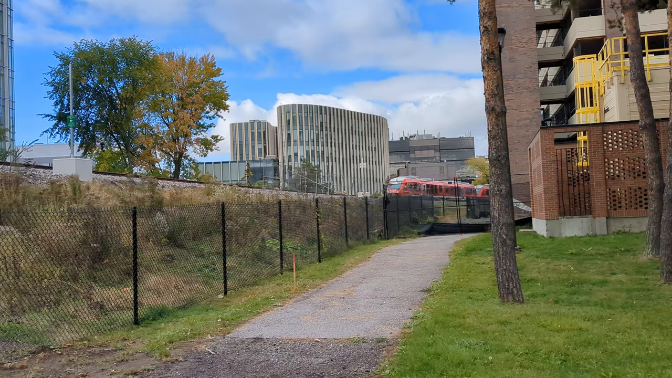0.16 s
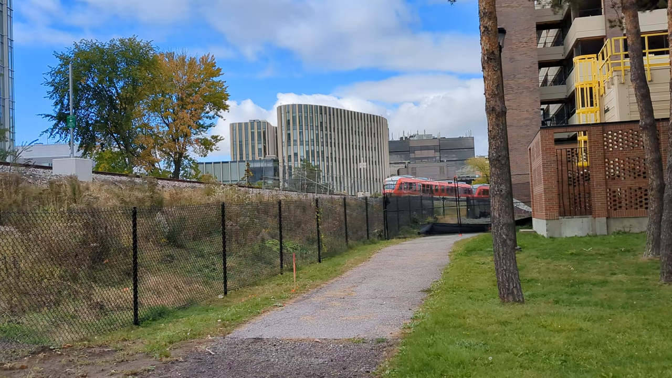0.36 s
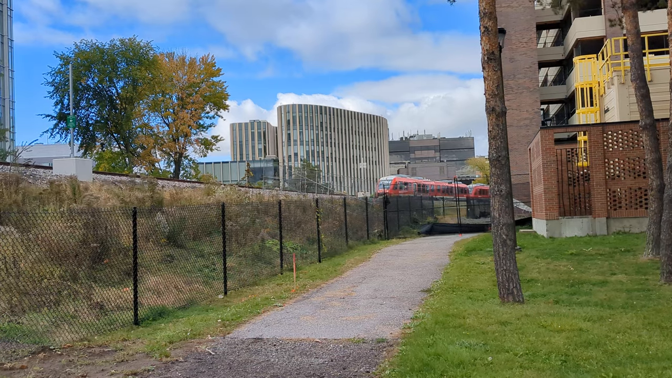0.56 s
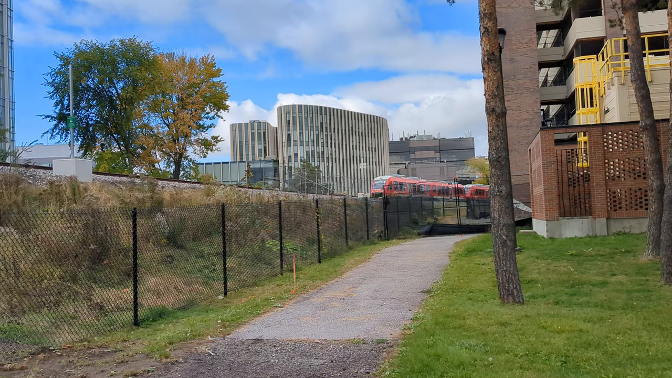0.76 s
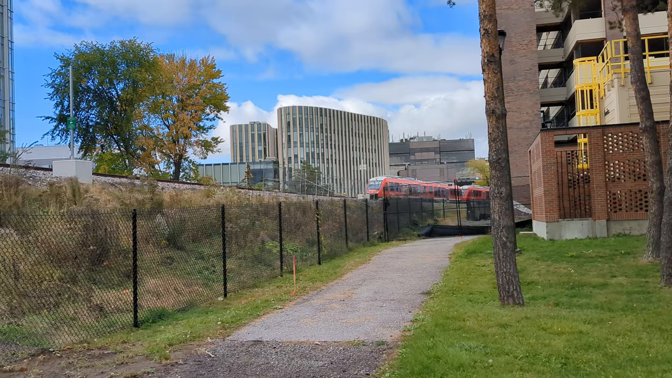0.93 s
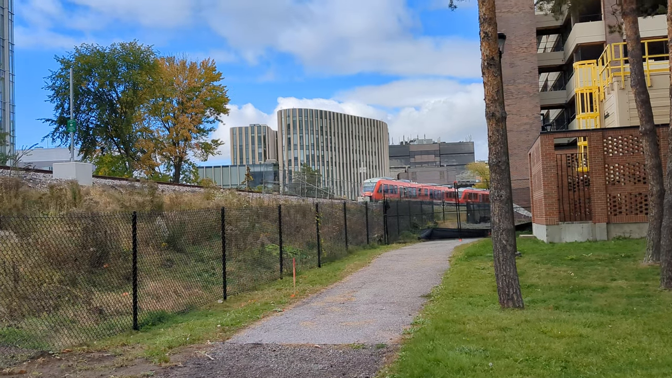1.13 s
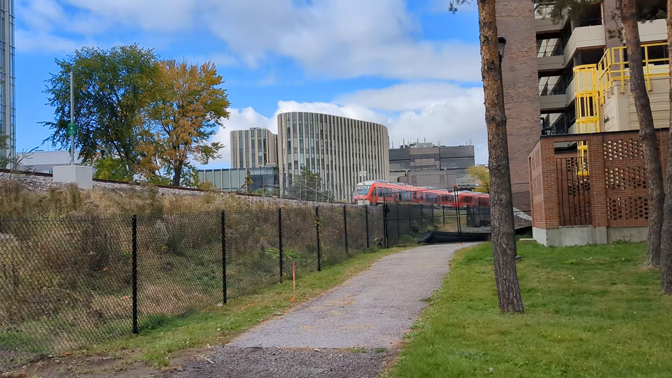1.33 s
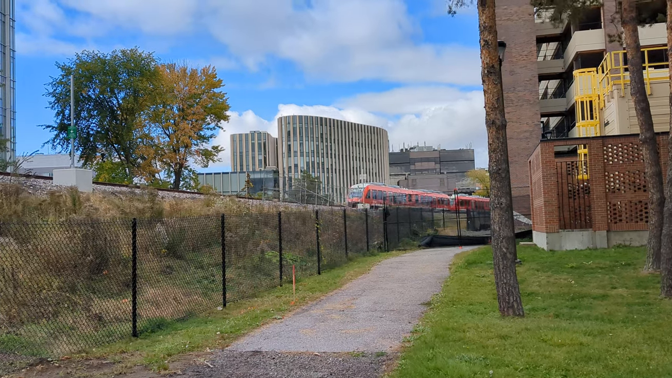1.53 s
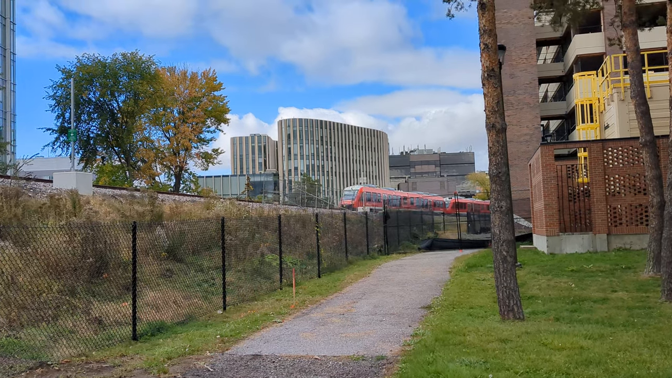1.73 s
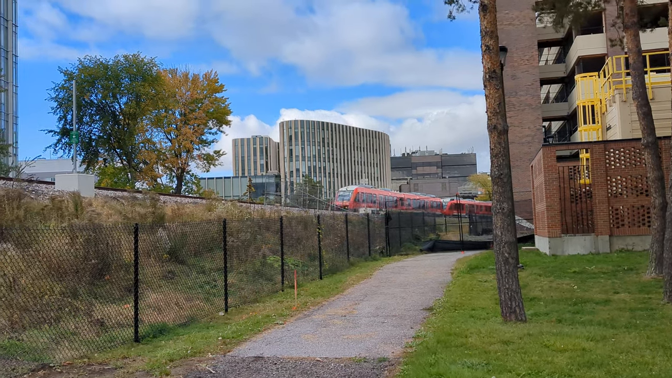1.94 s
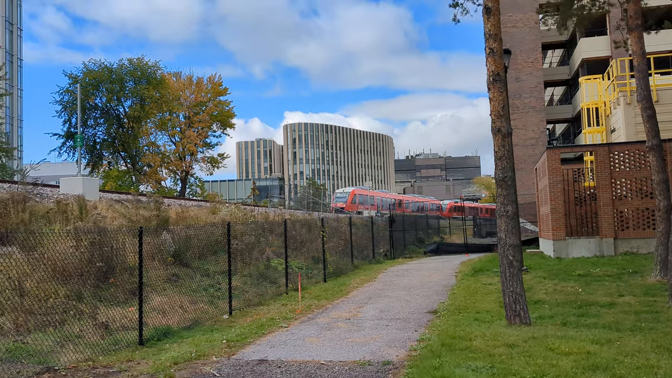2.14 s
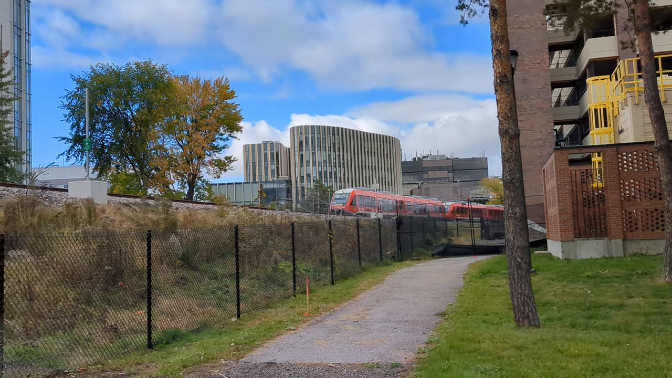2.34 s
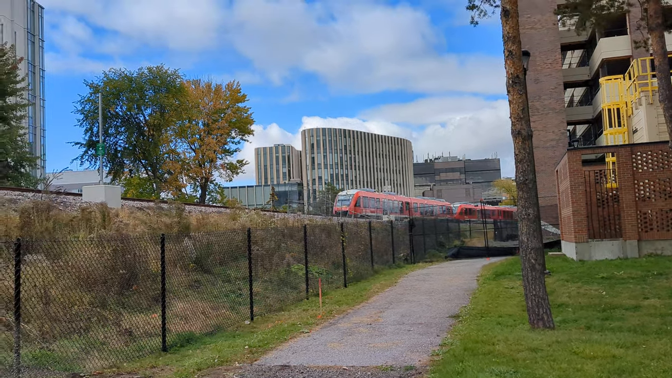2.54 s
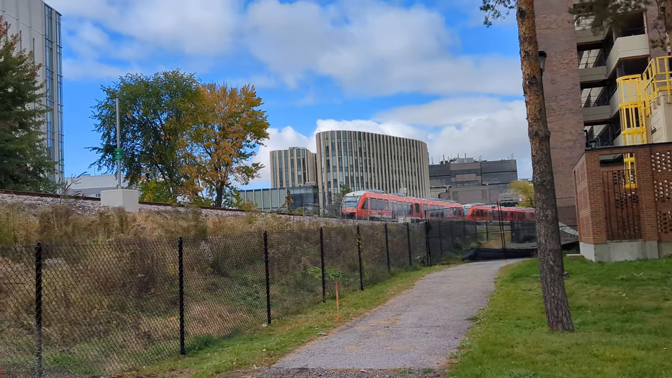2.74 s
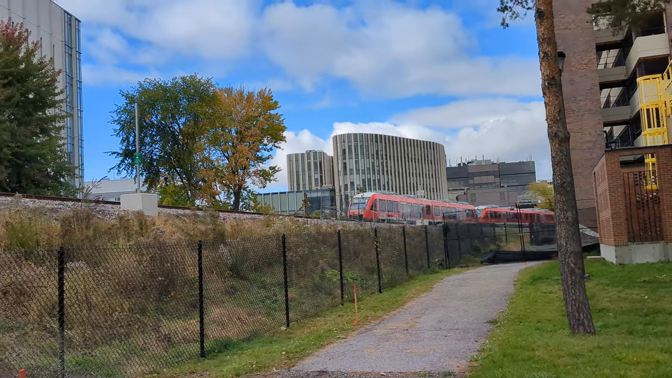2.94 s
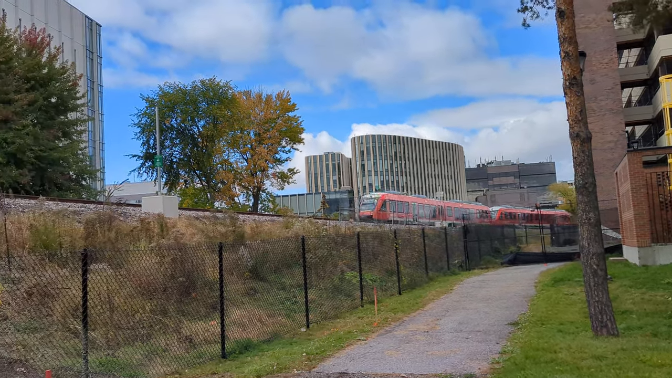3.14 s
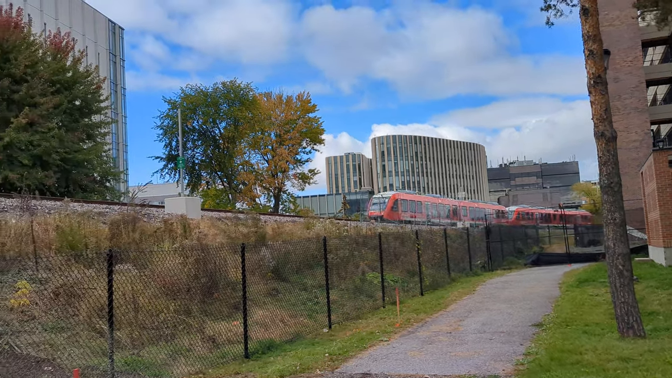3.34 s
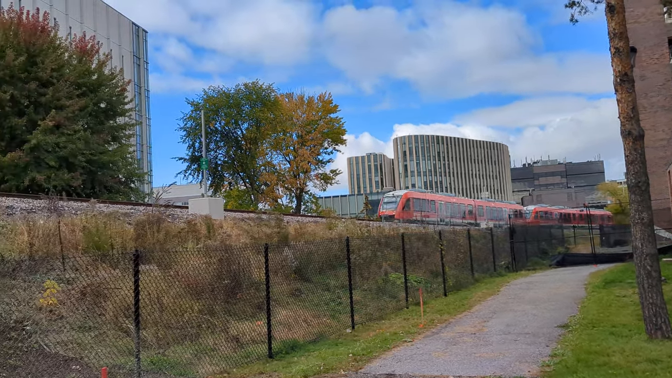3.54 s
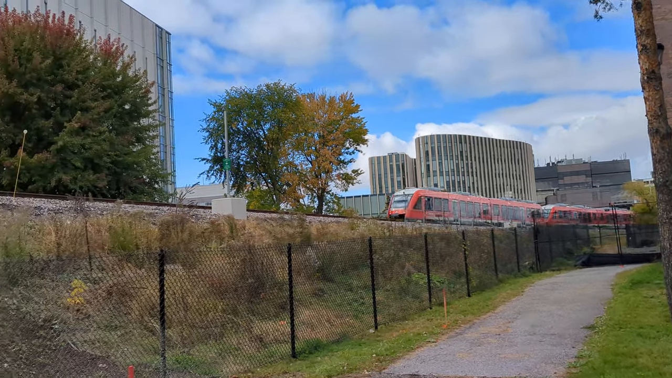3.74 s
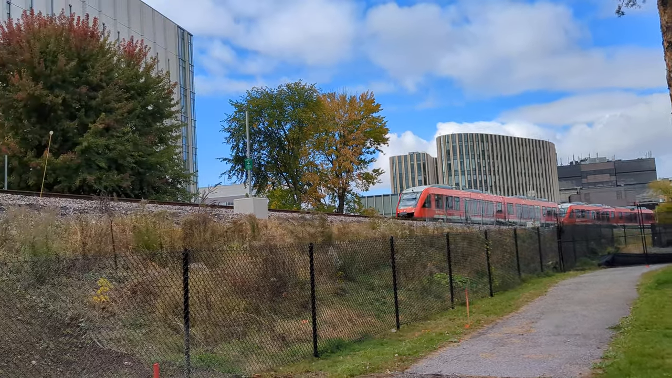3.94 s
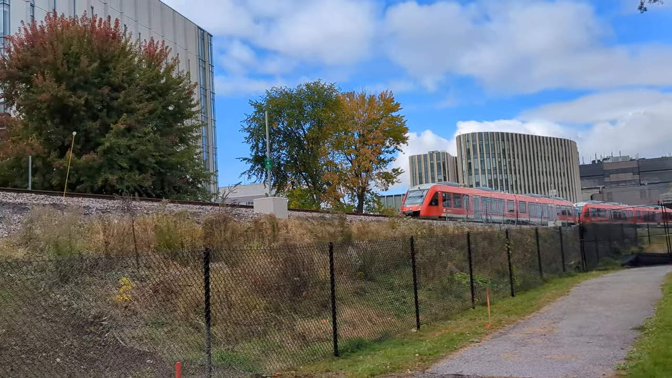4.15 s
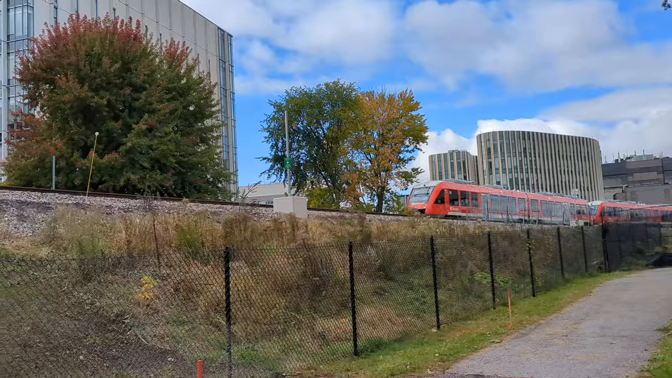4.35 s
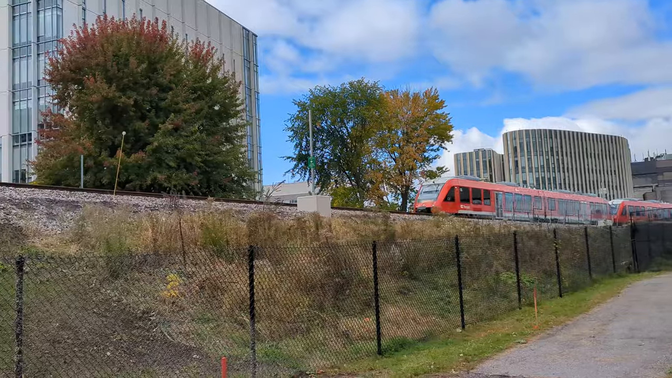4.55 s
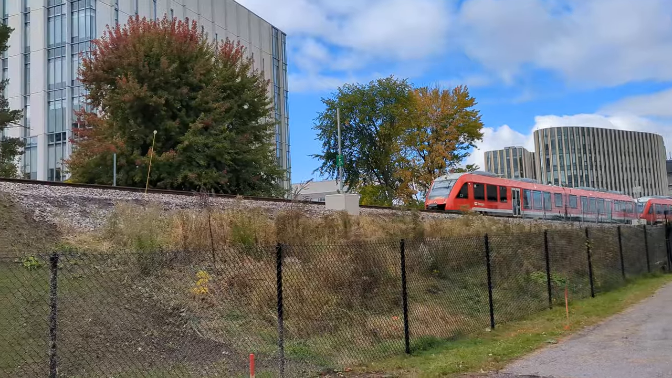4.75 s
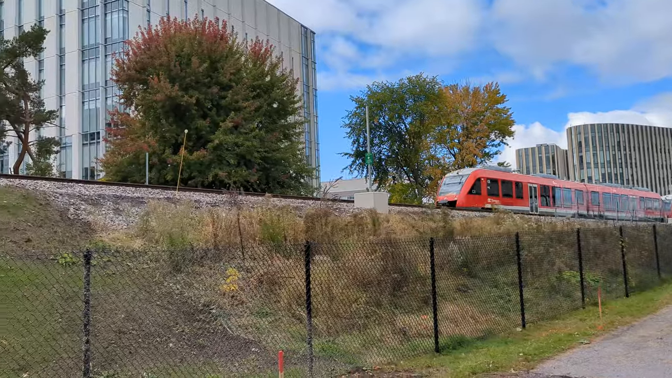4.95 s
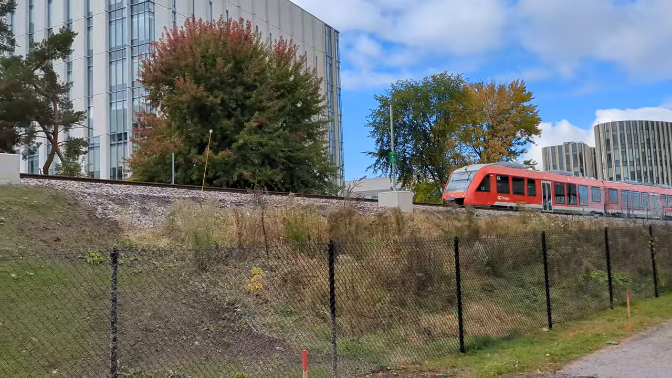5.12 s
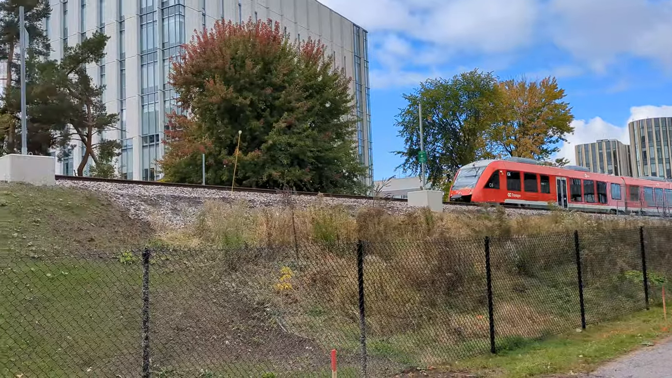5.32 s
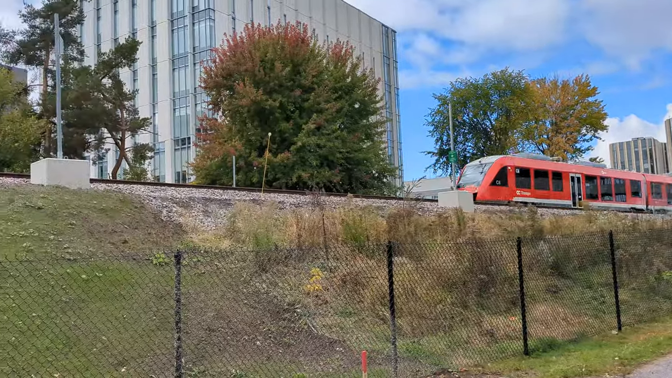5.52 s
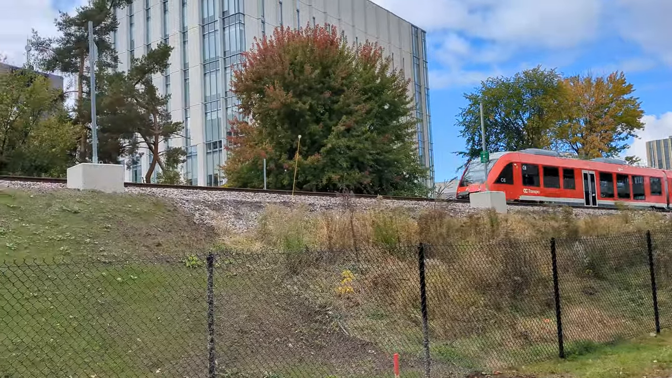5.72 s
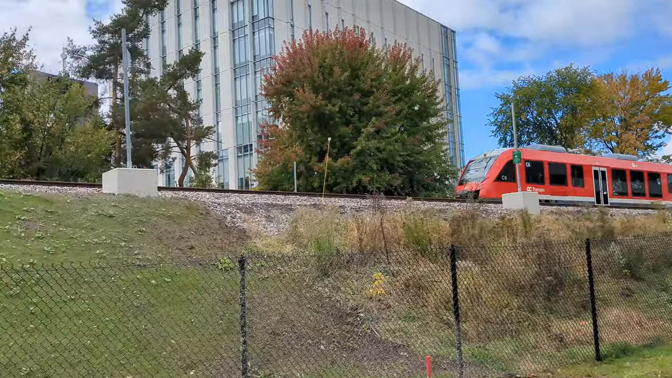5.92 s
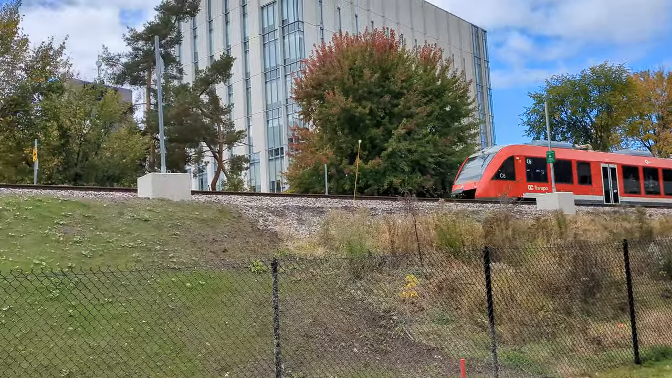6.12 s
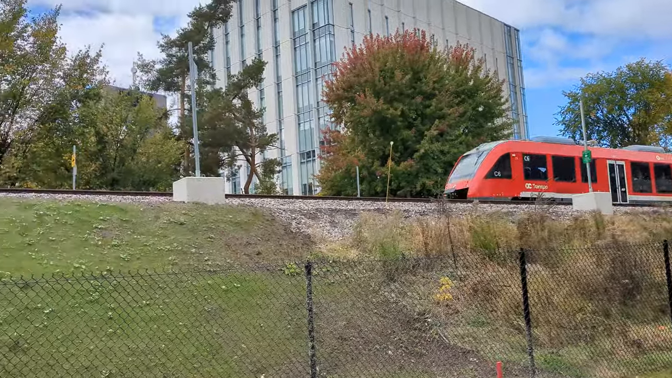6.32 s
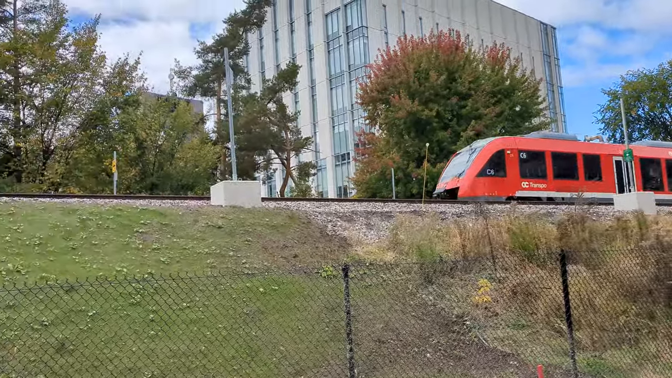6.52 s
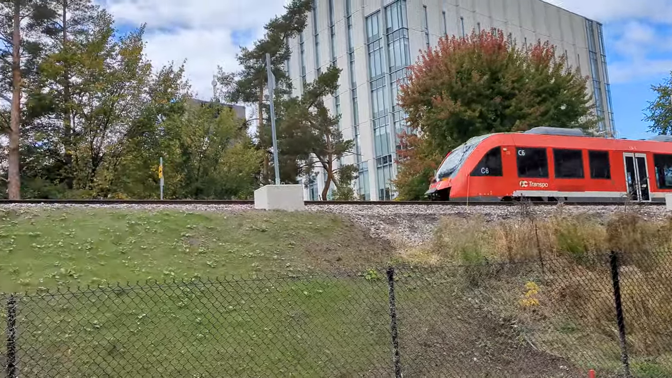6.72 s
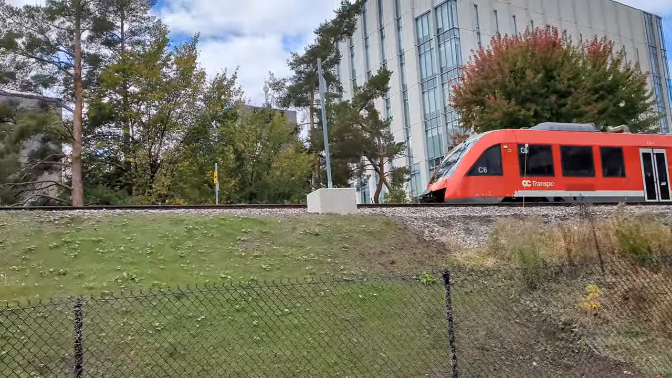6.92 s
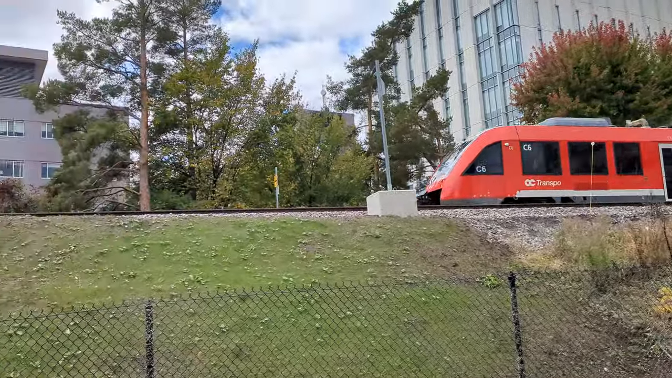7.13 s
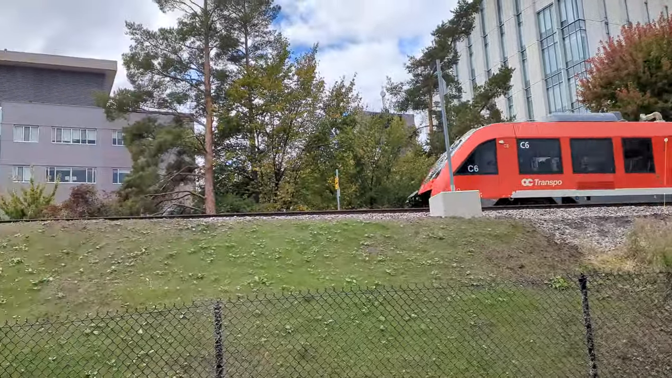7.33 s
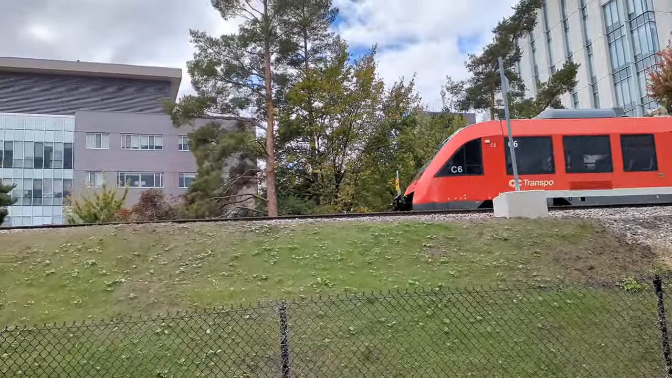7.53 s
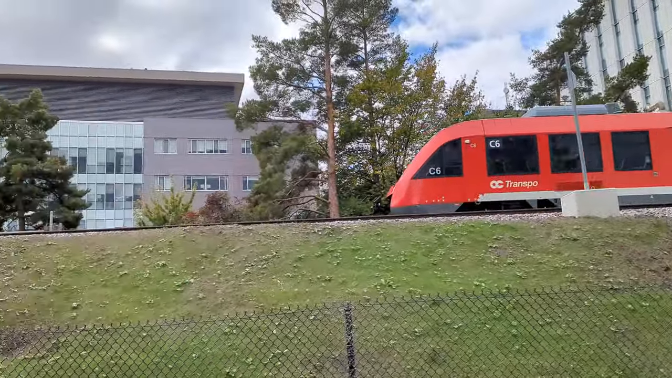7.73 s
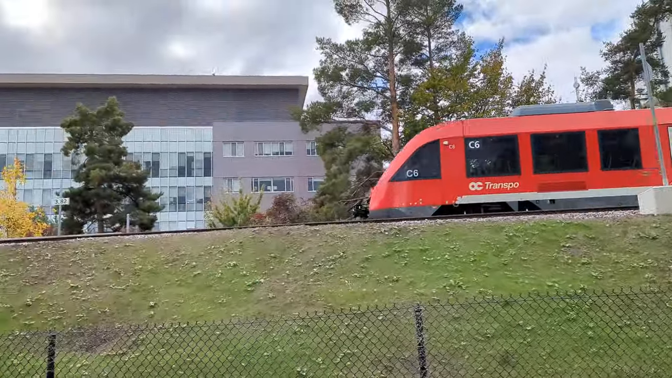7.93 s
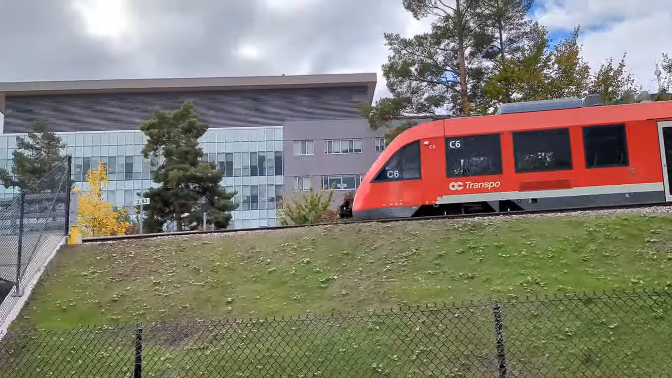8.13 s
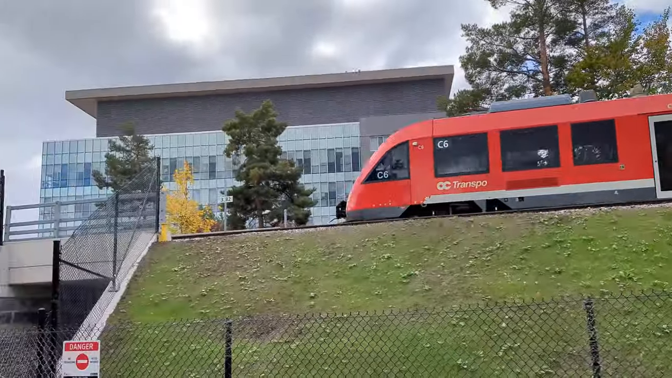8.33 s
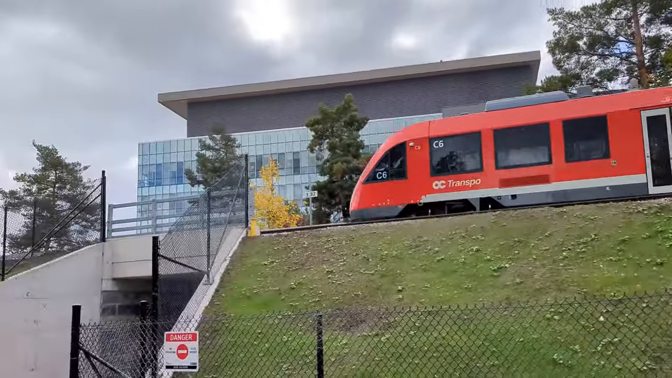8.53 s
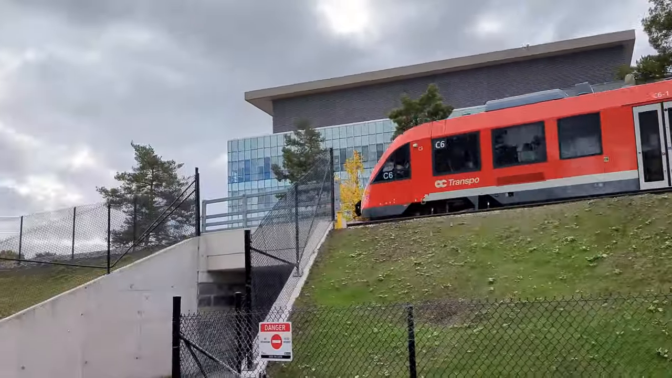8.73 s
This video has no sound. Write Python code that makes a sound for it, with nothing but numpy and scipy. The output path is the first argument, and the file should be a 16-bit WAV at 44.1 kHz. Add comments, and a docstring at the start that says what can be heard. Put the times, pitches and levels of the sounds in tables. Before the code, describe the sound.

Outdoor train pass: thin metallic wheel squeals and hissing scrapes build over a low diesel rumble, ending close by with a swelling exhaust and heavy wind thumps.

```python
"""Two coupled diesel railcars come round a curve on an embankment and draw level with the listener.
From the start wheel flanges grind in bouts and ring the wheels, over rolling roar and exhaust drone.
Gusts soon buffet the microphone; squeals, made of single wheel modes, come thicker and louder.
The leading engine revs up, changes gear and pulls again; buildings answer the squeals throughout.
Near the end the exhaust swells, and the train is closest while the flanges still scrape."""
import sys
import numpy as np
from scipy import signal
from scipy.fft import rfft, irfft, next_fast_len
from scipy.io import wavfile
from scipy.ndimage import uniform_filter1d, map_coordinates

SR = 44100
rng = np.random.default_rng(int(sys.argv[2]) if len(sys.argv) > 2 else 0)


def unload_wav(signal):
    """Save mono or channel-first audio to the path in sys.argv[1] as 16-bit WAV at rate SR, clipped to [-1, 1]."""
    wavfile.write(
        sys.argv[1],
        SR,
        np.round(np.clip(np.atleast_2d(signal).T, -1, 1) * 32767).astype(np.int16),
    )


N = 386757
CLOSEST_M = 15  # least distance to the train


def amp(db):
    """Decibels to gain."""
    return 10 ** (np.asarray(db) / 20)


def unit(x):
    """Scale to an rms (average strength) of 1."""
    return x / np.sqrt(np.mean(x ** 2) + 1e-20)


def along(points, hz):
    """Read (frequency [Hz], value) points on a log frequency axis."""
    f, v = np.transpose(points)
    return np.interp(np.log(hz + 1), np.log(f + 1), v)


def curves(rows):
    """One value per sample for each column after the time."""
    s, *cols = np.transpose(rows)
    return [np.interp(np.arange(N) / SR, s, c) for c in cols]


def during(rows):
    """A soft gate over the time that a curve covers."""
    start, end = rows[0][0], rows[-1][0]
    return np.interp(np.arange(N) / SR, [start - .06, start, end, end + .06], [0, 1, 1, 0])


def held(rows, attack_s, release_db_per_s):
    """Events that rise, hold and die away: one gain curve for each level column."""
    t = np.arange(0, N / SR, .002)
    start, end, *levels_db = np.transpose(rows)[:, :, None]
    rise = np.clip((t - start) / attack_s, 0, 1)
    gate = rise * amp(-release_db_per_s * np.maximum(t - end, 0))
    # events that overlap add up by power
    gains = [np.linalg.norm(gate * amp(db), axis=0) for db in levels_db]
    return curves(np.column_stack([t] + gains))


def wobble(rate, size=N):
    """A smooth random curve, rate knots a second."""
    knots = rng.standard_normal(int(size * rate / SR) + 4)
    return map_coordinates(knots, [np.arange(size) * rate / SR])


def filtered(x, response):
    """Shape x by a response of frequency."""
    m = next_fast_len(N + 8192)
    return irfft(rfft(x, m) * response(np.fft.rfftfreq(m, 1 / SR)), m)[..., :N]


def noise(response, alike):
    """Stereo noise of rms 1 with a given left-right likeness."""
    share = np.clip(alike, 0, 1)
    white = rng.standard_normal((3, N))
    stereo = np.sqrt(share) * white[2] + np.sqrt(1 - share) * white[:2]
    return unit(filtered(stereo, response))


def rush(spectrum, alike):
    """Noise with a broad colour, cut off an octave below its lowest point."""
    return noise(lambda hz: amp(along(spectrum, hz)) * (hz > spectrum[0][0] / 2), alike)


def ringing(modes, alike):
    """Resonances kept ringing by noise, as by friction."""
    def response(f):
        power = sum(amp(db) ** 2 / (1 + ((f - centre) / width * 2) ** 2) ** 1.87
                    for centre, width, db in modes)
        return np.sqrt(power)
    return noise(response, alike)


def patchy(x, depth_db):
    """The contact patch wanders, so that neighbouring bands swell and sink in turn."""
    z = signal.stft(x, nperseg=1024)[2]
    field = uniform_filter1d(rng.standard_normal(z.shape[1:]), size=7, axis=0)
    field = uniform_filter1d(field, size=16, axis=1)
    return unit(signal.istft(z * amp(depth_db * unit(field)), nperseg=1024)[1][:, :N])


def crowded(x):
    """Rail and bogie have countless weak modes, which ripple the colour finely."""
    def ripple(hz):
        return map_coordinates(rng.standard_normal(SR // 20), [hz / 20])
    return filtered(x, lambda hz: amp(1.4 * ripple(hz)))


def phase(hz):
    """Running phase of a moving pitch."""
    return 2 * np.pi * np.cumsum(hz) / SR


def pan(left_db):
    """Gains of the two channels, from how far left stands over right."""
    return amp([[left_db / 2], [-left_db / 2]])


def distance():
    """Metres to the train as it runs by at a steady speed."""
    speed_m_per_s, closest_s = 12, 8.3
    return np.hypot(CLOSEST_M, speed_m_per_s * (np.arange(N) / SR - closest_s))


def flanges():
    """Steel scrapes steel in stick and slip; the chatter drives the hiss and the wheel modes alike."""
    # bouts of flange contact: (start [s], end [s], hiss [dB], wheel ring [dB], grinding [dB])
    bout_rows = [(-0.02, 0.24, -56.5, -48, -53.5), (0.25, 0.32, -56, -43.5, -58),
                 (0.665, 1.08, -56, -47.5, -54.5), (1.08, 1.26, -57, -47, -58),
                 (1.37, 1.45, -52.5, -52, -54), (1.6, 1.68, -52.5, -41.5, -57),
                 (1.975, 2.13, -48, -40.5, -50.5), (2.14, 2.335, -45.8, -38.5, -53),
                 (2.482, 2.66, -46.5, -47, -53), (2.66, 2.94, -45.5, -42.5, -54),
                 (2.97, 3.19, -47.5, -45, -55), (3.18, 3.35, -48.5, -51, -53), (3.37, 3.6, -46, -47, -50),
                 (3.64, 3.9, -51.5, -56, -50), (3.96, 4.17, -49, -58, -54), (4.19, 4.28, -45, -39.5, -49),
                 (4.34, 4.42, -50, -58, -47), (4.47, 4.66, -42, -46, -42.5), (4.56, 4.66, -43, -35.5, -48),
                 (4.71, 4.8, -40.5, -40, -42.5), (4.82, 4.9, -46, -50, -58), (4.89, 5.06, -40.8, -41, -49),
                 (5.1, 5.38, -40.8, -56, -60), (5.39, 5.53, -39.5, -41, -47), (5.58, 5.88, -44.5, -49, -49),
                 (5.92, 6.4, -45, -54, -52), (6.06, 6.13, -52, -47, -54), (6.31, 6.37, -46, -48, -51),
                 (6.47, 6.68, -40, -54, -54), (6.85, 7.21, -40, -42, -48), (6.91, 7.08, -50, -34.5, -54),
                 (7.1, 7.25, -48, -41, -56), (7.425, 7.74, -36.8, -45, -45), (7.55, 7.8, -46, -44, -44.5),
                 (7.86, 7.98, -39, -41.5, -40.5), (7.99, 8.11, -32.4, -34.5, -37),
                 (8.12, 8.25, -34, -38.5, -43), (8.3, 8.44, -38, -39.5, -44),
                 (8.46, 8.57, -35.3, -42, -42.5)]
    # light rubbing between bouts, rows for hiss, wheel ring, grinding:
    # (level at the closest point [dB], loss with extra distance [dB per m])
    rubbing = [(-46.5, 0.34), (-51.5, 0.1), (-48, 0.16)]
    # resonances of rail and wheel: (frequency [Hz], width [Hz], level [dB])
    low_modes = [(1358, 79, -24), (2397, 140, -19), (2985, 70, -11.7), (3470, 140, -5.5), (3553, 46, 0),
                 (3790, 220, -19)]
    # higher resonances of the same: (frequency [Hz], width [Hz], level [dB])
    high_modes = [(4500, 180, -3.5), (4690, 100, -3), (5481, 80, -4), (5890, 50, -5.5), (6520, 120, -11),
                  (7060, 45, 1), (7170, 55, -1), (8880, 24, 1), (8975, 18, 1), (9680, 90, -7),
                  (10140, 26, 3), (10240, 24, 2), (11420, 40, -11), (11680, 55, -11)]
    # highest wheel modes, which carry only over a short way: (frequency [Hz], width [Hz], level [dB])
    top_modes = [(9350, 50, -2), (9700, 90, -3), (10120, 60, 0), (10500, 50, -5), (11330, 50, -5),
                 (11600, 45, -1.5), (12500, 80, -5), (13450, 50, -6)]
    # colour of the grinding: (frequency [Hz], relative level [dB])
    grind_colour = [(800, -40), (1050, -16), (1350, -7), (1700, -9), (1950, -2.5), (2450, 2.3),
                    (2750, -0.5), (3020, 1), (3250, -6), (3650, -1.5), (4200, -1.5), (5200, -5),
                    (7000, -39)]
    # colour of the hiss: (frequency [Hz], relative level [dB])
    hiss_colour = [(2500, -11), (4000, -1), (5200, -3.5), (7000, 2), (8000, -2), (8800, 0), (10000, -5.5),
                   (11000, -10.5), (12500, -26), (15000, -50)]
    # colour of the sizzle: (frequency [Hz], relative level [dB])
    sizzle_colour = [(7500, -5), (9500, 8), (11600, 5.8), (12500, 0), (13400, -1.5), (13900, -19),
                     (15600, -26)]
    mode_drift_db = 1.7
    attack_s, release_db_per_s = 0.04, 85
    ring_release_db_per_s = 130  # the rail damps the wheel as soon as the flange lets go
    far_body_per_m, far_dull_hz = 0.005, 5200  # dull hiss added per metre, and its upper edge

    farther_m = distance() - CLOSEST_M
    bouts = held(bout_rows, attack_s, release_db_per_s)
    bouts[1] = held(bout_rows, attack_s, ring_release_db_per_s)[1]
    hissing, rung, grinding = [np.hypot(bout, amp(db - loss * farther_m))
                               for bout, (db, loss) in zip(bouts, rubbing)]
    treble_db = -2.5 - 0.22 * farther_m  # the air takes treble over the way
    chatter = amp(0.69 * wobble(30) + 0.39 * wobble(130))

    ring = rung * amp(-1.1 + 0.7 * wobble(18)) * ringing(low_modes, alike=0.53) * pan(6.6)
    overtones = amp(-1.5) * patchy(ringing(high_modes, alike=0.51), mode_drift_db)
    # the air swallows the highest modes faster than the sizzle round them
    highest = amp(1.25 * treble_db) * patchy(ringing(top_modes, alike=0.46), mode_drift_db)
    grind = amp(1.3) * grinding * crowded(patchy(rush(grind_colour, alike=0.14), depth_db=1.9))
    hiss = amp(2.0) * patchy(rush(hiss_colour, alike=0.076), depth_db=2.0)
    # from afar the lower part of the hiss stands out
    dull_hiss = filtered(hiss, lambda hz: 1 / (1 + (hz / far_dull_hz) ** 10))
    hiss = hiss + far_body_per_m * farther_m * dull_hiss
    sizzle = amp(treble_db + 7) * patchy(rush(sizzle_colour, alike=0.077), depth_db=2.0)
    bright = overtones + highest + crowded(hiss + sizzle)
    return chatter * (ring + grind + hissing * bright)


def scrapes():
    """A flange bites into the rail and judders over it in coarse grains."""
    # gritty scrapes: (start [s], end [s], level [dB], centre [Hz], width [Hz])
    scrape_rows = [(2.578, 2.63, -40.5, 2120, 750), (3.39, 3.48, -47, 2100, 800),
                   (3.49, 3.57, -44.5, 2400, 650), (3.6, 3.68, -52, 2500, 700),
                   (4.58, 4.68, -44, 3780, 450), (4.74, 4.81, -46, 2400, 700), (5.41, 5.5, -42, 4500, 600),
                   (5.4, 5.62, -45.5, 2400, 650), (8.03, 8.11, -37, 2450, 700), (8.2, 8.5, -47, 2450, 700)]
    attack_s, release_db_per_s = .012, 150
    grit = unit(amp(2.5 * wobble(140)))
    out = 0
    for start, end, db, hz, width_hz in scrape_rows:
        level, = held([(start, end, db)], attack_s, release_db_per_s)
        out = out + level * ringing([(hz, width_hz, 0)], alike=.4)
    return grit * out


def long_squeal(start, end, swell_s, hz, db, rasp_db):
    """A wheel locks into one mode and swells; uneven slipping adds a rasp, mostly below the tone."""
    swell_depth_db, waver_db, rasp_hz = 11, 1.8, 185
    age = np.arange(N) / SR - start
    level, = held([(start, end, db)], attack_s=0.03, release_db_per_s=190)
    swell_db = swell_depth_db * (np.clip(age / swell_s, 0, 1) - 1) + waver_db * wobble(16)
    carrier = np.exp(1j * phase(hz + 12 * wobble(90) + 6 * wobble(12)))
    tone = amp(3) * unit(amp(1.8 * wobble(35)))
    skirt = filtered(rng.standard_normal((2, 2, N)), lambda f: 1 / (1 + (f / rasp_hz) ** 2) ** 1.2)
    rasp = amp(rasp_db) * unit(skirt + 0.28 * skirt[:, ::-1])  # each channel leaks into the other
    sag = np.exp(-1j * phase(np.full(N, 70)))  # centres the rasp 70 Hz below the tone
    return level * amp(swell_db) * np.real(carrier * (tone + sag * (rasp[0] + 1j * rasp[1])))


def long_squeals():
    """Wheels held in one mode by friction sing in long squeals."""
    # (start [s], end [s], swell time [s], pitch [Hz], level before swell and waver [dB], rasp [dB])
    long_rows = [(5.62, 5.72, 0.08, 10235, -42, 0.5), (5.79, 6.46, 0.64, 10236, -35, 0.5),
                 (6.47, 6.7, 0.04, 10216, -32.5, 1), (7.98, 8.12, 0.08, 11510, -35, -1),
                 (8.09, 8.23, 0.09, 11562, -25, -2.5), (8.25, 8.44, 0.05, 11545, -33.5, -0.5),
                 (8.42, 8.59, 0.06, 11514, -30, -3)]
    return sum(long_squeal(*row) for row in long_rows)


def short_squeals():
    """Single wheel modes swell out of the hiss with a ragged skirt and sink back."""
    # (start [s], length [s], pitch [Hz], level before the 3.5 dB boost below [dB], width [Hz])
    short_rows = [(0, 0.12, 1360, -54, 70), (.12, .2, 2280, -54, 400), (1.96, 0.4, 2985, -55, 60),
                  (2.6, .57, 8975, -48.5, 14), (2.55, 0.5, 8884, -51, 18), (2.72, .26, 10230, -50, 30),
                  (2.0, .16, 1360, -55, 90), (2.1, .35, 8900, -52, 60), (2.78, 0.54, 4657, -48.5, 30),
                  (2.55, .55, 5440, -53, 70), (3.2, .6, 4510, -49, 90), (3.6, .35, 5530, -50, 25),
                  (2.5, 0.62, 4480, -48.5, 190), (3.27, 0.32, 5920, -54, 40), (4.5, .6, 5500, -47.5, 550),
                  (5.6, .55, 4680, -50, 150), (4.35, .1, 2950, -51, 120), (3.363, 0.2, 1380, -49, 55),
                  (3.35, 0.44, 11400, -52, 90), (3.395, .7, 5400, -48.5, 240),
                  (3.701, 0.7, 10120, -50, 240), (4.331, .15, 4700, -46.5, 220),
                  (4.471, 0.31, 3900, -46, 500), (4.7, .8, 8884, -45.5, 25), (4.8, 0.7, 10140, -42.5, 25),
                  (5.1, 0.22, 8920, -43, 45), (5.05, 0.4, 10255, -45, 25), (4.85, .6, 9640, -48, 110),
                  (5.1, .28, 7060, -45.5, 35), (5.38, .18, 5860, -46, 120), (5.85, 1.05, 9700, -45.5, 200),
                  (6.88, .36, 12510, -48, 50), (5.369, 0.23, 3850, -42, 300), (5.603, 0.8, 9980, -41, 50),
                  (6.75, 0.48, 10175, -39, 70), (6.88, .42, 4650, -48, 70), (6.85, .36, 13440, -50, 70),
                  (6.85, 0.57, 6970, -43.5, 40), (7.52, .16, 11644, -32, 80), (7.425, 0.27, 13437, -50, 40),
                  (7.4, 0.55, 8600, -42.5, 110), (7.42, 0.36, 12300, -39.5, 600),
                  (8.0, .2, 10000, -37, 300), (7.85, 1.1, 9377, -50, 121), (8.44, .22, 5850, -45, 120),
                  (7.87, .09, 8760, -41, 50), (8.54, .22, 4580, -46, 110), (8.65, .25, 11620, -42, 40),
                  (8.6, .25, 9300, -43, 150)]
    out = np.zeros((2, N + 2 * SR))
    for start, length, hz, db, width_hz in short_rows:
        n = int(length * SR)
        offset = (np.fft.rfftfreq(n, 1 / SR) - hz) / width_hz
        white = rng.standard_normal(n) + 0.81 * rng.standard_normal((2, n))
        peak = (1 + (2 * offset) ** 2) ** -.55 / (1 + (offset / 10) ** 2)
        tone = unit(irfft(rfft(white) * peak, n))
        swell = np.sin(np.linspace(0, np.pi, n)) ** 1.35
        out[:, round(start * SR):][:, :n] += amp(db) * tone * swell
    return amp(3.5) * out[:, :N]


def wheel_notes():
    """A wheel mode locks on, sings with an unsteady grip and rings out; each port hears its own flicker."""
    # clean notes, one mode locked in: (start [s], end [s], pitch [Hz], level [dB])
    note_rows = [(.69, 1.26, 3548, -51.5), (1.975, 2.28, 3020, -55), (2.0, 2.33, 3553, -43),
                 (2.5, 3.3, 2975, -58.5), (2.66, 2.92, 3554, -47), (4.93, 5.02, 10135, -43),
                 (5.15, 5.3, 10135, -42), (5.15, 5.29, 8884, -44), (5.4, 5.54, 3580, -44),
                 (5.4, 5.5, 4655, -45), (6.395, 6.42, 10228, -31), (6.865, 6.98, 5884, -40.5),
                 (7.01, 7.22, 6966, -46), (6.87, 7.2, 11596, -46), (7.37, 7.48, 9329, -44),
                 (7.435, 7.48, 5884, -42), (7.53, 7.6, 5884, -45), (7.62, 7.68, 5880, -38),
                 (7.425, 7.7, 11644, -39), (8.45, 8.54, 5820, -37.5)]
    attack_s, release_db_per_s, waver_db, wander_hz = .04, 150, 2.2, 9
    rasp_rad, rasp_per_s = .38, 170  # slipping roughens the note
    out = np.zeros((2, N + 2 * SR))
    for start, end, hz, db in note_rows:
        n = int((end - start + .5) * SR)
        age = np.arange(n) / SR
        fade_db = release_db_per_s * np.maximum(start + age - end, 0)
        gate = np.clip(age / attack_s, 0, 1) * amp(db - fade_db)
        own_flicker = np.array([wobble(45, n), wobble(45, n)]) / 2
        grip = unit(amp(waver_db * (wobble(25, n) + own_flicker)))
        rasp = rasp_rad * np.array([wobble(rasp_per_s, n), wobble(rasp_per_s, n)])
        turn = phase(hz + wander_hz * wobble(60, n)) + rasp
        out[:, round(start * SR):][:, :n] += np.sqrt(2) * gate * grip * np.sin(turn)
    return out[:, :N]


def arriving(pair):
    """The wheels move to the right, so their sound reaches the left port ever later on the whole."""
    # (time [s], lag of the left port [samples])
    bearing = [(0, 2), (1, 1.9), (2.2, 1.23), (3, 2.33), (4, 3.2), (4.6, 8.2), (5.3, 5.7), (6.2, 8.1),
               (7, 6.55), (7.5, 13.6), (8.77, 16.06)]
    left_times = np.arange(N) - curves(bearing)[0]
    return np.array([map_coordinates(pair[0], [left_times], order=5), pair[1]])


def exhaust(turn):
    """Firing pulses muffled to their lowest orders; from afar they blur into a rumble."""
    # tone colour: (multiple of the firing rate, relative level from afar [dB], close by [dB])
    orders = [(1, 2.5, 3), (2, -11, -20), (3, -15.5, -34), (5, -25.5, -25.5), (6, -21.5, -22)]
    # colour of the rumble: (frequency [Hz], relative level [dB])
    rumble_colour = [(25, -28), (45, -6.5), (70, 1), (100, -1.5), (150, -10.5), (400, -43.5)]
    # set level of the exhaust: (time [s], level [dB])
    exhaust_level = [(0, -55), (0.3, -52.5), (0.6, -56), (1.9, -54.5), (2.3, -50.5), (3.28, -51.5),
                     (3.32, -41), (3.87, -35.5), (4.45, -44.5), (5.0, -51.5), (6.15, -48.5), (6.72, -41.5),
                     (7.42, -38.5), (7.68, -20.5), (7.88, -18), (8.2, -30), (8.55, -44), (8.77, -41)]
    near = np.interp(np.arange(N) / SR, [5.5, 7.4], [0, 1])
    tone = 0
    for k, far_db, near_db in orders:
        order_db = far_db + near * (near_db - far_db) + (2.5 - 1.4 * near) * wobble(22)
        start_rad = rng.uniform(0, 2 * np.pi) + np.array([[0], [.72]])  # the right runs ahead
        tone = tone + amp(order_db) * np.sin(k * turn + start_rad)
    rumble = amp(-3.5 - 8.4 * near) * rush(rumble_colour, alike=0.46)
    surge_db = 2.3 * (1 - near) * wobble(16)  # the distant exhaust comes and goes on the air
    return amp(curves(exhaust_level)[0] + surge_db) * (amp(1.6 * near) * tone + rumble)


def hum(rows, rough_db):
    """A single low engine note, slightly unsteady."""
    hz, db = curves(rows)
    return np.sqrt(2) * during(rows) * amp(db + rough_db * wobble(24)) * np.sin(phase(hz))


def engines():
    """Two diesels, with a casing growl that throbs at the firing rate."""
    # the leading engine revs up, changes gear and pulls again: (time [s], firing rate [Hz])
    revs = [(0, 67.2), (1, 70.8), (2, 74.04), (3, 77.26), (3.6, 78.76), (4.35, 82.2), (4.6, 74.45),
            (4.95, 62.66), (5.6, 60.1), (6, 62.14), (6.6, 64), (7.3, 65.5), (7.7, 66.23), (8.77, 66.5)]
    # note of the second railcar's engine: (time [s], pitch [Hz], level [dB])
    trailing = [(.7, 137.2, -65), (1.1, 143, -60.5), (2, 137.6, -63), (3, 137.8, -62.5), (3.6, 143, -51),
                (3.95, 144, -52)]
    # deep drone under the near engine: (time [s], pitch [Hz], level [dB])
    drone = [(5.7, 39.8, -64), (6.2, 37.1, -61), (6.6, 36.2, -54), (7.5, 34.36, -49), (7.7, 34, -52)]
    # casing growl: (time [s], level [dB])
    growl_level = [(0, -61), (0.6, -65), (1.1, -60), (3.1, -60), (3.5, -50.5), (3.9, -52), (4.2, -56),
                   (5.3, -55), (5.62, -47), (6.5, -52.5), (7.1, -47.5), (7.35, -51), (7.65, -39),
                   (8.0, -34.5), (8.3, -41.5), (8.77, -47)]
    # colour of the growl: (frequency [Hz], relative level [dB])
    casing_colour = [(120, -16), (215, -13), (320, 0), (395, 3.3), (520, -11.5), (680, -5.5), (820, -12),
                     (1000, -32), (1500, -34)]
    turn = phase(curves(revs)[0])
    throb = 1 + .65 * np.sin(turn)
    growl = amp(curves(growl_level)[0]) * unit(throb * rush(casing_colour, alike=0.82))
    return exhaust(turn) + hum(trailing, rough_db=1.5) + hum(drone, rough_db=4.0) + growl


def rolling():
    """Wheels roar on the rails and the running gear knocks now and then."""
    # rolling roar before the 3 dB boost below: (time [s], level [dB])
    roar_level = [(0, -53), (0.62, -57), (0.76, -53.5), (1.9, -55), (2.1, -52), (3.1, -53), (3.45, -46.5),
                  (3.9, -46), (4.3, -51), (4.8, -49), (5.3, -52), (5.55, -47), (6.1, -52), (6.65, -53),
                  (6.98, -48.5), (7.35, -51), (7.62, -43), (8.08, -40.5), (8.3, -45.5), (8.77, -48)]
    # colour of the roar: (frequency [Hz], relative level [dB])
    roar_colour = [(40, -17), (140, -2.5), (215, -4.5), (300, -5.5), (480, -5), (640, 0), (800, -0.5),
                   (1020, -8), (1200, -4), (1350, -1), (1620, -8), (1850, -5), (2300, -7.5), (5000, -30)]
    # knocks: (time [s], level before the gain of 1.33 [dB], centre [Hz], width [Hz], 60 dB decay [s])
    knocks = [(5.135, -36, 300, 260, 0.05), (6.159, -38.5, 420, 260, 0.47)]
    roar = patchy(rush(roar_colour, alike=0.28), depth_db=0.58)
    out = amp(curves(roar_level)[0] + 3) * roar * pan(-1.9)
    for s, db, hz, width_hz, t60 in knocks:
        age = np.maximum(np.arange(N) / SR - s, 0)
        envelope = amp(db - 60 * age / t60) * (1 - np.exp(-age / 0.0052))
        out = out + envelope * ringing([(hz, width_hz, 0)], alike=0.29) * 1.33
    return out


def wind():
    """Gusts on a light breeze, each from its own side, buffet and flutter on the microphone ports."""
    # gusts: (start [s], end [s], buffet before the 1.34 dB boost [dB], flutter [dB], left over right [dB])
    gusts = [(0.9, 1.2, -54, -62, -2), (1.19, 1.56, -49, -68, -5), (2.58, 2.95, -50.5, -62, -1),
             (3.27, 3.46, -44.5, -62, -1), (3.46, 3.96, -39.5, -59, 0), (4.0, 4.2, -40, -60, -2),
             (4.2, 4.34, -37, -45, 9), (4.35, 4.41, -38, -50, 8), (4.5, 4.8, -49, -60, -1),
             (4.9, 5.1, -44.5, -64, -8), (5.3, 5.85, -53, -59, -1), (6.3, 6.75, -51, -62, -1),
             (6.93, 7.01, -49, -60, -1), (7.54, 7.82, -34, -54, 4), (7.83, 7.93, -29, -44, -5),
             (7.94, 8.05, -29, -45, 5), (8.1, 8.28, -35, -47, 0), (8.28, 8.42, -33.5, -46, -9),
             (8.42, 8.52, -35.5, -52, -6), (8.52, 8.63, -36, -48, -4), (8.65, 8.77, -44, -55, -1)]
    # colour of the buffeting: (frequency [Hz], relative level [dB])
    buffet_colour = [(20, -28), (40, -2), (65, 1), (110, 1), (150, -2.5), (210, -8), (270, -9), (450, -20),
                     (1200, -62)]
    # colour of the flutter of small eddies: (frequency [Hz], relative level [dB])
    flutter_colour = [(120, -12), (250, 0), (400, 0), (600, -9), (1200, -35)]
    breeze_db = -58  # before the same boost as the buffets

    def port(side):
        rows = [(start, end, buffet_db + side * left_db / 2, flutter_db + side * left_db / 2)
                for start, end, buffet_db, flutter_db, left_db in gusts]
        return held(rows, attack_s=0.06, release_db_per_s=170)

    buffet, flutter = np.stack([port(1), port(-1)], axis=1)
    lumps = amp(1.5 * wobble(28) + 1.6 * np.array([wobble(35), wobble(35)]))
    thudding = np.hypot(buffet, amp(breeze_db)) * unit(lumps * rush(buffet_colour, alike=0.26))
    return amp(1.34) * thudding + flutter * unit(lumps * rush(flutter_colour, alike=0.5))


def thumps():
    """Each eddy gives the diaphragms one short push and pull, harder at the port that it meets."""
    # eddies that strike the microphone: (time [s], rough peak [dB], centre [Hz], left over right [dB])
    eddies = [(1.241, -38, 130, -4), (1.322, -39, 185, -4), (1.425, -35.5, 150, -5), (1.495, -40, 175, -4),
              (1.701, -39, 120, -2), (3.595, -32, 130, 0), (3.751, -27, 115, 0), (3.859, -27, 120, 0),
              (3.93, -31, 140, 0), (4.174, -30, 120, 0), (4.244, -29, 175, 9), (4.268, -31, 280, 9),
              (4.285, -28.5, 175, 9), (4.322, -28, 165, 9), (4.339, -25, 290, 9), (4.387, -28, 200, 8),
              (4.413, -28, 100, 8), (5.141, -32, 130, -7), (7.893, -12, 130, -5), (7.899, -20, 340, -5),
              (7.969, -19, 150, 3), (8.025, -21, 200, 4), (8.041, -23, 340, 3), (8.063, -21, 300, 4),
              (8.235, -22, 90, 0), (8.315, -19.5, 135, -9), (8.337, -20.5, 140, -9),
              (8.375, -21.5, 150, -9), (8.4, -16.5, 185, -9), (8.43, -26, 150, -8), (8.484, -25, 200, -6)]
    half_cycles, port_rad = .55, .6  # half-length of the push, and how much the two ports differ
    out = np.zeros((2, N + SR))
    t = np.arange(-(SR // 25), SR // 25) / SR
    for s, db, hz, left_db in eddies:
        turn = rng.uniform(0, 2 * np.pi) + port_rad * rng.standard_normal((2, 1))
        push = np.exp(-(t * hz / half_cycles) ** 2) * np.cos(2 * np.pi * hz * t + turn)
        out[:, round((s + t[0]) * SR):][:, :len(t)] += amp(db) * pan(left_db) * push
    return out[:, :N]


def buildings(x):
    """A short diffuse answer from the facades, different in each ear."""
    # how fast the answer dies away: (frequency [Hz], 60 dB decay [s])
    walls = [(200, 0.12), (3000, 0.88), (12000, 0.13)]
    hz, t, z = signal.stft(rng.standard_normal((2, SR // 2)), SR, nperseg=256)
    decay = amp(-60 * t / along(walls, hz)[:, None])
    tail = signal.istft(z * decay, SR, nperseg=256)[1]
    return signal.fftconvolve(x[None], tail / np.linalg.norm(tail[0]), axes=1)[:, :N]


def scene():
    """Wheels, engines and wind together, with the squeals echoed by the buildings."""
    squeal = short_squeals() + wheel_notes() + long_squeals()
    echo = amp(-8) * buildings(squeal.mean(axis=0))
    wheels = arriving(flanges() + scrapes() + squeal)
    return wheels + echo + engines() + crowded(rolling()) + wind() + thumps()


def record(dry):
    """The microphone sheds the deepest bass and nothing passes above the band limit."""
    top_hz = 15700
    return filtered(dry, lambda hz: (hz < top_hz) * (1 - np.exp(-(hz / 28) ** 4)))


dry = scene()
out = record(dry)
unload_wav(out)
```